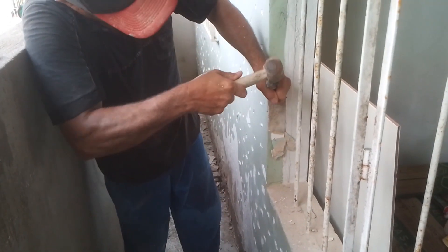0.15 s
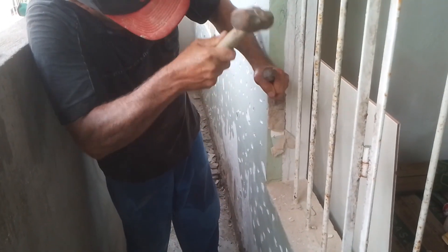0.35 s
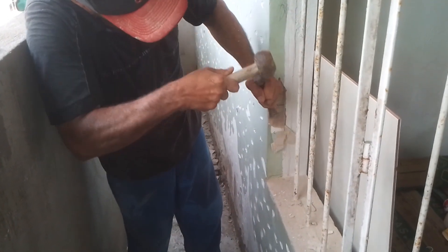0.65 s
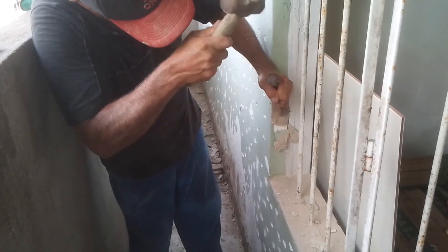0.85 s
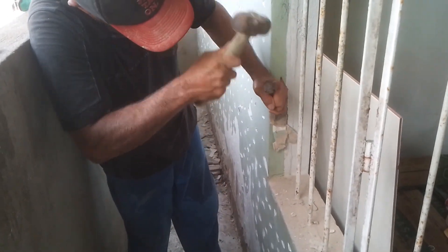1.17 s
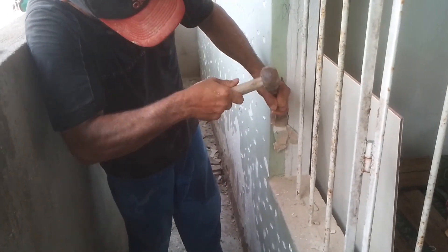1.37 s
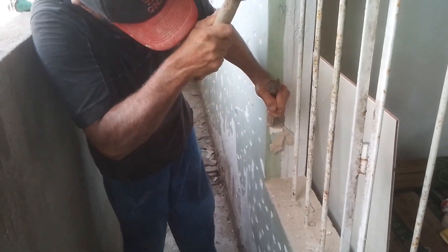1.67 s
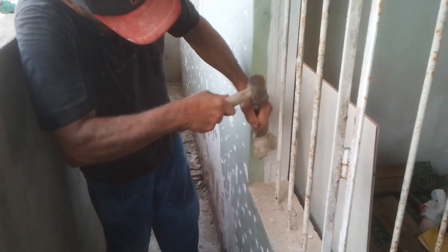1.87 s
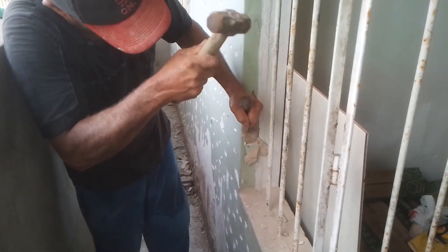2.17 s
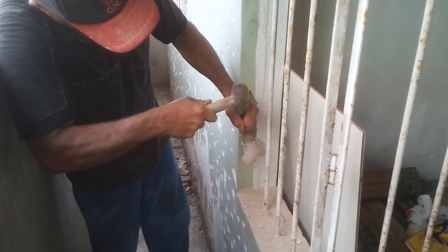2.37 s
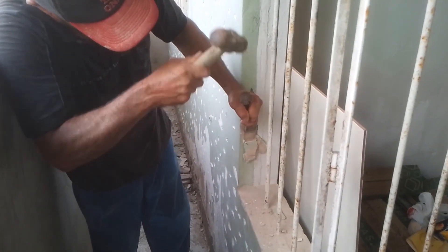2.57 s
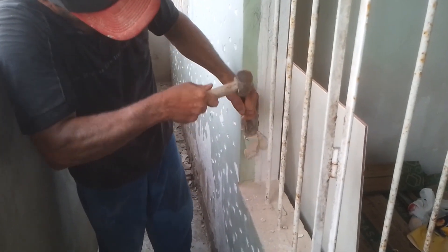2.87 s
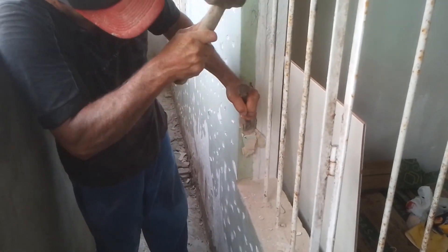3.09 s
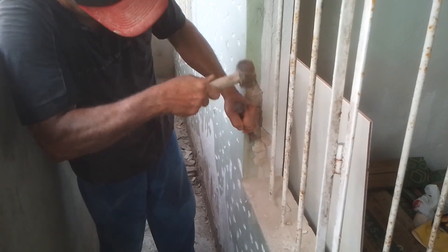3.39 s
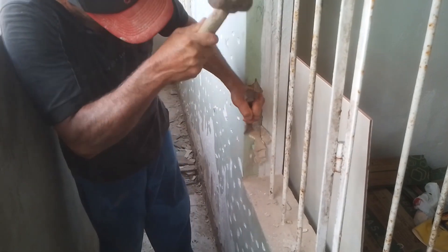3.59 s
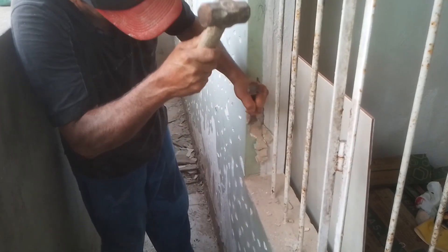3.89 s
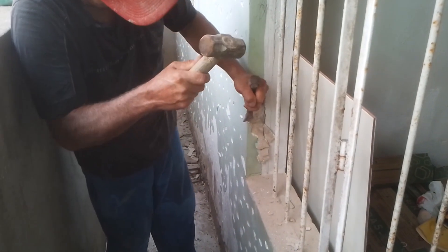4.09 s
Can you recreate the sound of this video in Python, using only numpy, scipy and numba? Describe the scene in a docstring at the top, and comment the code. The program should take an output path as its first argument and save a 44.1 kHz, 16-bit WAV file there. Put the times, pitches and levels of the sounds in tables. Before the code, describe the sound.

Close, loud club-hammer blows hit a steel chisel set in cement render, seven in about four seconds. Each is a bright metallic crack with gritty crushing, a dull wall knock and a quick rebound. Chips clack down between the early blows; later grit snaps and spills. A narrow hard-walled outdoor passage adds a short ringing tail. Close stereo microphone, faint steady hiss.

```python
"""Over a faint steady background, seven blows of a club hammer on a hand-held steel chisel are heard.
Each blow crushes cement render in noise bursts and excites the decaying lengthwise modes of the chisel.
A narrow outdoor passage answers with direct sound, near reflections, band-wise decay and standing waves.
Between blows chips clack, the chisel clinks, and grit snaps and trickles: contacts and bursts shaped by filters.
A look-ahead limiter, clipping and a steep low-pass end the chain."""
import sys
import numpy as np
from scipy import signal
from scipy.fft import rfft, irfft
from scipy.io import wavfile
from scipy.ndimage import uniform_filter1d
from numba import njit

SR = 44100
rng = np.random.default_rng(int(sys.argv[2]) if len(sys.argv) > 2 else 0)


def to_wav(sig):
    """Store sig (one row per channel, or 1-D mono) as 16-bit WAV at the path in sys.argv[1].

    Samples outside -1..1 are clipped; the rate is SR.
    """
    pcm = np.clip(np.atleast_2d(sig), -1, 1) * 32767
    pcm = np.round(pcm).astype(np.int16)
    wavfile.write(sys.argv[1], SR, pcm.T)  # frames by channels


N = 186919

# Faint background, spectrum: [f/Hz, level/dB]
AIR_SPECTRUM = [(25, -3.5), (80, -15.5), (170, -19), (280, 9), (600, -11.5), (2000, -6.5), (5000, 4.5),
                (7500, 3), (11000, 3), (16000, -32.5)]
# Decay of the passage: [f/Hz, t60/s]
PASSAGE_DECAY = [(60, 0.067), (280, 0.66), (600, 0.51), (1500, 0.38), (4000, 0.44), (8000, 0.37),
                 (11500, 0.39), (16000, 0.33)]
# Standing waves of the passage: [f/Hz, level/dB before the gain in passage(), t60/s]
STANDING_WAVES = [(278, -48.5, 0.72), (333, -54, 0.69)]
# Two microphone ports: [f/Hz, left minus right level/dB]
PORT_DIFFERENCE = [(200, -0.5), (1400, -0.5), (3000, -2), (5000, 0), (6500, 13.5), (7600, 8), (8800, 4.5),
                   (10000, -10.5), (11300, -11), (12500, 0)]
# Short granular bursts: spills of trickling grit, and at 0.0 s the fading end of an earlier blow:
#   [start t/s, length/s, level/dB]
GRANULAR_BURSTS = [(0.0, 0.009, -41.5), (2.185, .07, -44), (2.621, 0.24, -19), (3.084, 0.076, -30),
                   (3.552, 0.076, -23), (3.813, 0.065, -32.5), (4.142, 0.02, -45.5)]
# Flakes snapping off: [t/s, level/dB]
FLAKE_SNAPS = [(0.457, -29), (2.316, -40), (2.586, -36), (2.6256, -11.5), (2.685, -13.5)]
# Grit and flakes, spectrum: [f/Hz, level/dB]
GRIT_SPECTRUM = [(100, -25.5), (400, -23.5), (1200, -11.5), (2100, -4), (4000, -8.5), (6500, 1.5),
                 (8500, 2), (10400, 7), (12500, -7), (16000, -10)]
# Chisel touching the wall as it is moved: [t/s, level/dB]
CHISEL_TOUCHES = [(0.984, -25), (1.691, -55.5), (3.789, -49.5), (4.026, -43), (4.108, -55.5)]
# Contact noise of a touch, spectrum: [f/Hz, level/dB]
TOUCH_SPECTRUM = [(100, -14), (300, 8.5), (1000, 0), (4200, -3), (7500, -4), (11500, 4), (13000, -33),
                  (16000, -9)]
# Chips of render landing on the sill: [t/s, level/dB, deepest ring f/Hz, crumbling t60/s]
CHIP_LANDINGS = [(0.3349, -10, 950, 0.016), (0.7442, -8.5, 664, 0.028), (0.876, -27, 700, .03),
                 (0.9655, -14.5, 630, 0.034), (1.19, -40.5, 1638, .01), (1.5148, -27, 1400, 0.0059),
                 (3.782, -25, 546, 0.32)]
# Lengthwise modes of the chisel: [f/Hz before stiffening, level/dB, t60/s before scaling by the seat]
CHISEL_MODES = [(4190, -4.5, .028), (7560, -3, .008), (11270, 2, .019), (11590, -8, .014),
                (13350, -16, .012), (14450, -11, .016)]
# Crushing render under the edge, spectrum: [f/Hz, level/dB]
CRACK_SPECTRUM = [(60, -38.5), (500, -7.5), (1500, -0.5), (3000, 2), (5000, 5), (6200, 0), (7800, 10),
                  (9200, 4), (10700, 3.5), (11800, -19.5), (12600, -3.5), (16000, -26)]
# Dull knock of the wall, spectrum: [f/Hz, level/dB]
KNOCK_SPECTRUM = [(25, -45.5), (70, -26.5), (175, -11), (220, 2.5), (350, 2), (650, -2), (1050, -10.5),
                  (1450, 5), (1850, 3.5), (2500, -5), (4000, -20), (12000, -21.5)]
# Hammer blows: [t/s, level/dB, stiffening of the lowest chisel mode/Hz, wall knock level/dB,
#   ring of the loosened render f/Hz, brittleness as treble lift/dB, delay of the rebound/s]
HAMMER_BLOWS = [(0.103, 0, 410, -10.5, 1400, -6, 0.036), (0.5184, -3.5, 23, -4, 1280, -0.5, 0.073),
                (1.2529, -4, 220, -3, 950, 5.5, .03), (1.871, -4, 140, -8, 1360, 8.5, .029),
                (2.3434, -2, 74, -4.5, 1400, -3, .016), (2.763, -3.5, 85, -5, 1200, 9.5, .056),
                (3.2185, -2, 90, -8.5, 1430, 13, 0.039)]

TOP_HZ = 15850  # upper band edge
RING = SR  # samples given to one sound
AGE = np.arange(RING) / SR  # s since the onset of a sound
CRUSH_T60_S = 0.025  # at zero treble lift
CRUSH_HALVING_DB = 18.5  # this much treble lift halves the crushing time
REBOUND_DB, REBOUND_LOSS_DB_PER_S = -2.5, 150.5  # the later the head lands again, the weaker
CHIP_BANDWIDTH = 4.28  # a chip turns dull above this multiple of its deepest ring
CRUMBLE_EVEN_S = 0.047  # crumbling t60 at which crumbs and landing are mixed one to one
STRAY_DB, STRAY_SPREAD_DB = -48.5, 7  # mean and standard deviation of stray grain levels
SEATED_RING, LOOSE_RING = 0.89, 1.7  # chisel ring time under a blow and lightly held, multiples of t60


def amp(db):
    """Level in decibels to amplitude ratio."""
    return 10 ** (np.asarray(db) / 20)


def fade(t60):
    """Exponential decay: 60 dB down after t60 seconds."""
    return np.exp(-np.log(1000) * AGE / t60)


def unit(x):
    """Normalisation to unit energy."""
    return x / np.sqrt(np.sum(x ** 2, axis=-1, keepdims=True))


def along(points, hz):
    """Linear interpolation of (f/Hz, value) points on a log-frequency axis."""
    f, value = np.transpose(points)
    return np.interp(np.log(np.maximum(hz, 1)), np.log(f), value)


def colour(x, points):
    """Minimum-phase filtering: the folded cepstrum turns (f/Hz, level/dB) points into a causal response."""
    n = 2 * x.shape[-1]
    hz = np.arange(n // 2 + 1) * SR / n
    cepstrum = irfft(np.log(amp(along(points, hz))))
    cepstrum[1:n // 2] *= 2
    cepstrum[n // 2 + 1:] = 0
    response = np.exp(rfft(cepstrum))
    return irfft(rfft(x, n) * response)[..., :n // 2]


def even(x, width_hz=350):
    """Spectral whitening: the inverse of the smoothed power spectrum flattens a short burst."""
    power = np.mean(np.abs(rfft(np.atleast_2d(x))) ** 2, axis=0)
    power = uniform_filter1d(power, size=int(width_hz * RING / SR)) / power.mean()
    hz = np.arange(len(power)) * SR / RING
    return colour(x, np.c_[hz, -10 * np.log10(power)][1:])


def mode(hz, t60):
    """Damped resonance: one decaying cosine of unit energy."""
    return unit(np.cos(2 * np.pi * hz * AGE) * fade(t60))


def grains(envelope):
    """Granular fracture: dense noise samples of log-normal size under an envelope."""
    sizes = amp(4 * rng.standard_normal(RING))
    return unit(even(rng.standard_normal(RING) * sizes * envelope))


def tick(rough, t60):
    """Impulsive contact: one sharp impulse plus decaying crumbling of relative strength rough."""
    return unit(even(signal.unit_impulse(RING) + rough * grains(fade(t60))))


def add(track, s, sound):
    """Superposition: a sound is added to a track from time s."""
    start = int(s * SR)
    part = sound[..., :track.shape[-1] - start]
    track[..., start:start + part.shape[-1]] += part


def stereo_noise(size, alike_hz=420):
    """Diffuse-field coherence: noise at two close ports, alike in the bass and unrelated in the treble."""
    mid, side = rfft(rng.standard_normal((2, size)))
    hz = np.arange(len(mid)) * SR / size
    likeness = .9 / (1 + (hz / alike_hz) ** 2)
    mid = mid * np.sqrt(1 + likeness)
    side = side * np.sqrt(1 - likeness) * np.array([[1], [-1]])
    return irfft(mid + side, size) / np.sqrt(2)


def passage(direct_db, near_db, near_t60=0.036, build_s=0.0047, lump_db=1.5):
    """Impulse response: direct sound, near walls, an echo decaying band by band, and standing waves."""
    noise = rfft(stereo_noise(RING))
    hz = np.arange(RING // 2 + 1) * SR / RING
    centres = np.geomspace(60, 16000, num=12)
    echo = 0
    # each row of the identity selects one of twelve overlapping bands
    for centre, share in zip(centres, np.eye(len(centres))):
        band = along(np.c_[centres, share], hz)
        echo = echo + irfft(noise * band) * fade(along(PASSAGE_DECAY, centre))
    echo *= 1 - np.exp(-AGE / build_s)
    echo += amp(near_db) * even(stereo_noise(RING) * fade(near_t60))
    # reflections arrive in bunches
    bunches = uniform_filter1d(rng.standard_normal(RING), size=130)
    echo *= amp(lump_db * bunches / bunches.std() - 28.5)
    echo[:, 0] += amp(direct_db)
    return echo + sum(amp(db + 25) * mode(f, t60) for f, db, t60 in STANDING_WAVES)


def heard(sound, response):
    """Convolution: a sound as the passage carries it to both ports."""
    return signal.fftconvolve(sound[None], response)[:, :RING]


def air(level_db=-71):
    """Stationary noise: a faint, steady, partly coherent background."""
    return amp(level_db) * colour(stereo_noise(2 * N), AIR_SPECTRUM)[:, :N]


def strays(count=8):
    """Random events: faint snaps at uniformly drawn moments, as rows of (t/s, level/dB)."""
    return [(rng.uniform(0, N / SR), STRAY_DB + STRAY_SPREAD_DB * rng.standard_normal())
            for _ in range(count)]


def grit(snap_db=8, trickle_db=13):
    """Granular noise: flakes snap, sand runs down in spills; the burst at 0.0 s ends an earlier blow."""
    out = np.zeros((2, N))
    for s, db in FLAKE_SNAPS + strays():
        snap = colour(grains(fade(0.013)), GRIT_SPECTRUM)
        room = passage(direct_db=-7.0, near_db=11.0, near_t60=0.021)
        add(out, s, amp(snap_db + db) * heard(snap, room))
    for s, length, db in GRANULAR_BURSTS:
        # a burst gathers, runs and stops
        flow = (1 - np.exp(-AGE / 0.0099)) * np.exp(-(AGE / length) ** 4)
        burst = colour(grains(flow), GRIT_SPECTRUM)
        room = passage(direct_db=-2.0, near_db=-3.5)
        add(out, s, amp(trickle_db + db) * heard(burst, room))
    return out


def chisel(stiffen_hz, freedom):
    """Modes of a bar: a firm seat raises the low modes most, a loose one lets all ring longer."""
    ring = 0
    for k, (hz, db, t60) in enumerate(CHISEL_MODES):
        ring = ring + amp(db) * mode(hz + stiffen_hz / (k + 1), t60 * freedom)
    return ring


def clinks(level_db=12, contact_db=1):
    """Light damping: a lightly held chisel rings on after each touch of the wall."""
    out = np.zeros((2, N))
    for s, db in CHISEL_TOUCHES:
        touch = amp(contact_db) * colour(tick(rough=0.41, t60=0.011), TOUCH_SPECTRUM)
        ring_tone = [(4200, -4.0), (7500, 7.0), (11500, -4.5), (13000, -12.5)]
        ring = colour(chisel(0, freedom=LOOSE_RING), ring_tone)
        room = passage(direct_db=-12.5, near_db=3, near_t60=0.068)
        add(out, s, amp(level_db + db) * heard(touch + ring, room))
    return out


def chips(level_db=15):
    """Impact of brittle bodies: a deeper ring brings an earlier treble loss, longer crumbling a softer landing."""
    out = np.zeros((2, N))
    for s, db, low_hz, crumble_t60 in CHIP_LANDINGS:
        dull_hz = CHIP_BANDWIDTH * low_hz
        body = [(150, -28), (240, -4), (low_hz / 2, -6), (low_hz, 1),
                (dull_hz, -3), (dull_hz * 2, -14), (16000, -32)]
        landing = tick(rough=np.sqrt(crumble_t60 / CRUMBLE_EVEN_S), t60=crumble_t60)
        clack = colour(landing, sorted(body))
        room = passage(direct_db=-2.5, near_db=12.0, near_t60=.028)
        add(out, s, amp(level_db + db) * heard(clack, room))
    return out


def blows(level_db=19, steel_db=-5.0, plate_db=-11, plate_t60=0.014, thump_db=-31):
    """Impact excitation: steel rings, render crushes, the wall knocks, and the head lands once more."""
    out = np.zeros((2, N))
    for s, db, stiffen_hz, knock_db, plate_hz, brittle_db, rebound_s in HAMMER_BLOWS:
        # brittle render breaks sooner and brighter
        crush_t60 = CRUSH_T60_S * .5 ** (brittle_db / CRUSH_HALVING_DB)
        crack = colour(grains(fade(crush_t60)), CRACK_SPECTRUM)
        crack = colour(crack, [(8000, 0.021), (14000, brittle_db)])
        knock = colour(tick(rough=1.0, t60=crush_t60), KNOCK_SPECTRUM)
        knock = knock + amp(plate_db) * mode(plate_hz, plate_t60)
        steel = amp(steel_db) * chisel(stiffen_hz, SEATED_RING)
        hit = crack + steel + amp(knock_db) * knock
        room = passage(direct_db=-12.5, near_db=2, near_t60=0.18)
        add(out, s, amp(level_db + db) * heard(hit, room))
        rebound_db = REBOUND_DB - REBOUND_LOSS_DB_PER_S * rebound_s
        room = passage(direct_db=-22.5, near_db=7.5)
        add(out, s + rebound_s, amp(level_db + db + rebound_db) * heard(hit, room))
        # the whole wall gives a short deep thump, heard only straight from it
        thump = colour(signal.unit_impulse(RING), [(20, 0.5), (70, 9.5), (140, -7.0), (400, -26.5)])
        add(out, s, amp(level_db + thump_db + db + knock_db) * thump)
    return out


def scene():
    """Superposition of all sources, with the port difference split evenly between the two sides."""
    left, right = air() + grit() + clinks() + chips() + blows()
    left = colour(left, [(hz, db / 2) for hz, db in PORT_DIFFERENCE])
    right = colour(right, [(hz, -db / 2) for hz, db in PORT_DIFFERENCE])
    return np.array([left, right])


@njit
def follow(x, attack, release):
    """Envelope detection: first-order smoothing with separate rates for rise and fall."""
    out, e = np.empty(len(x)), 0.
    for i in range(len(x)):
        e += (x[i] - e) * (attack if x[i] > e else release)
        out[i] = e
    return out


def record(dry, limit_db=-7, attack_s=0.00096, release_s=0.021, ahead_s=0.0051, strength=0.62):
    """Look-ahead compression above limit_db, then clipping at full scale and an elliptic low-pass."""
    envelope = follow(np.abs(dry).max(axis=0), 1 / (attack_s * SR), 1 / (release_s * SR))
    # reading the envelope ahead lowers the gain before the peak
    envelope = np.interp(np.arange(N) + ahead_s * SR, np.arange(N), envelope)
    excess = np.maximum(envelope / amp(limit_db), 1)
    limited = dry / excess ** min(strength, 1)
    low_pass = signal.ellip(10, .2, 70, TOP_HZ, fs=SR, output="sos")
    return signal.sosfilt(low_pass, np.clip(limited, -1, 1))


dry = scene()
out = record(dry)
to_wav(out)
```